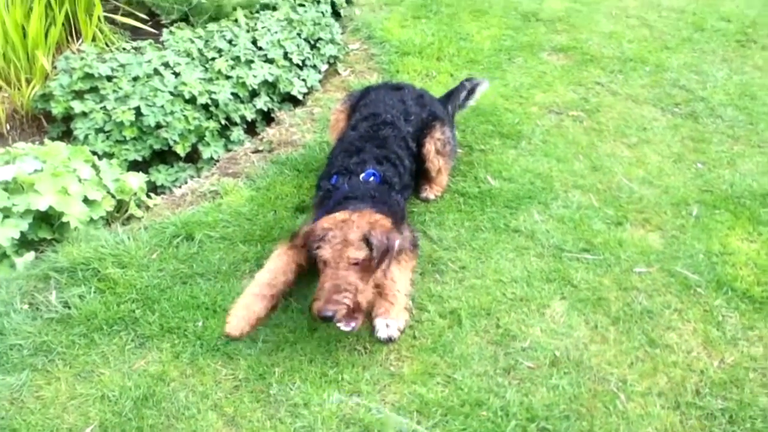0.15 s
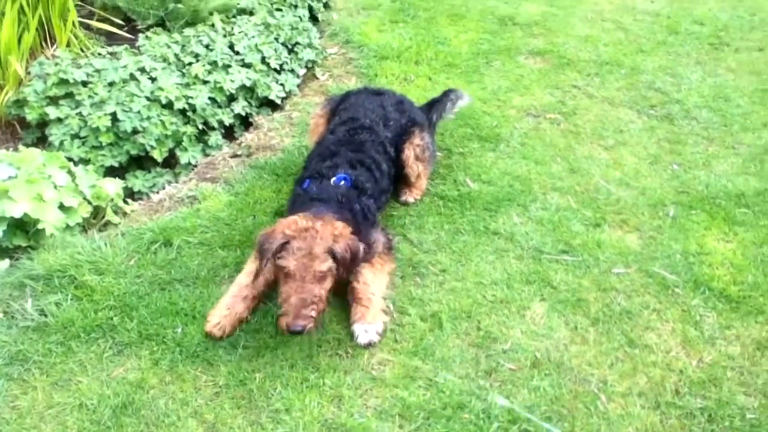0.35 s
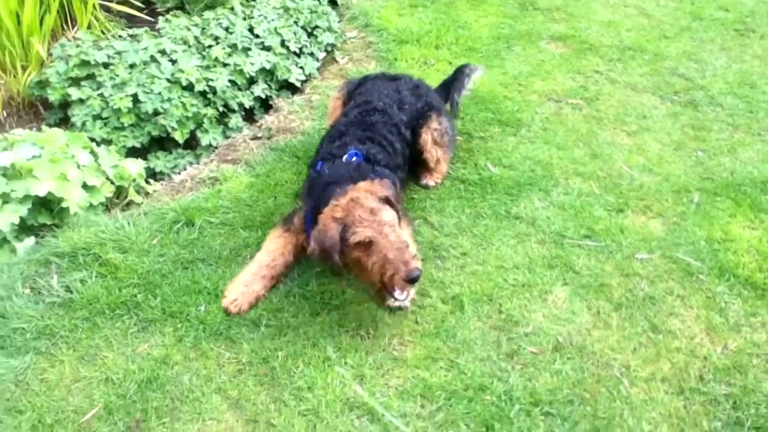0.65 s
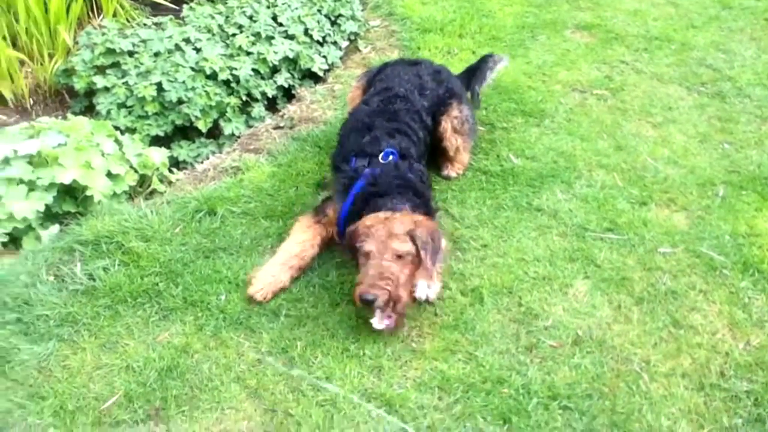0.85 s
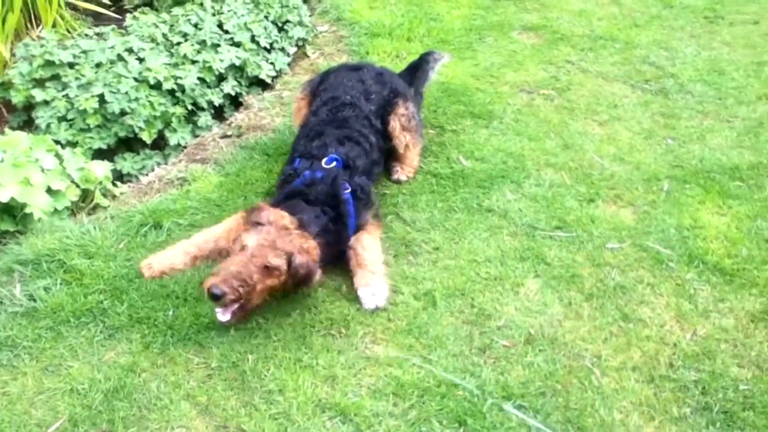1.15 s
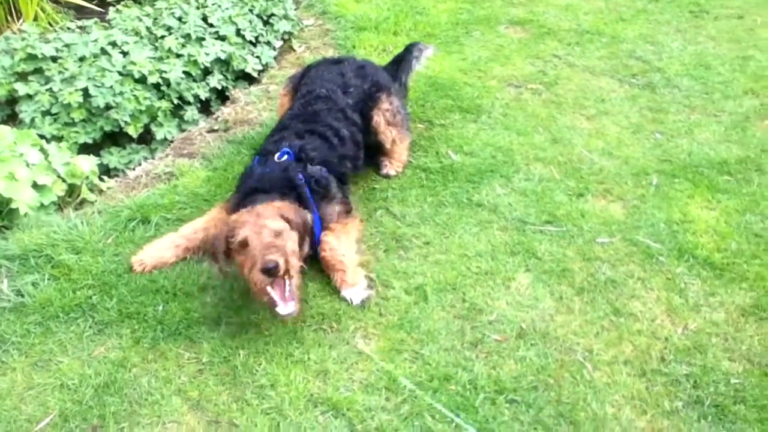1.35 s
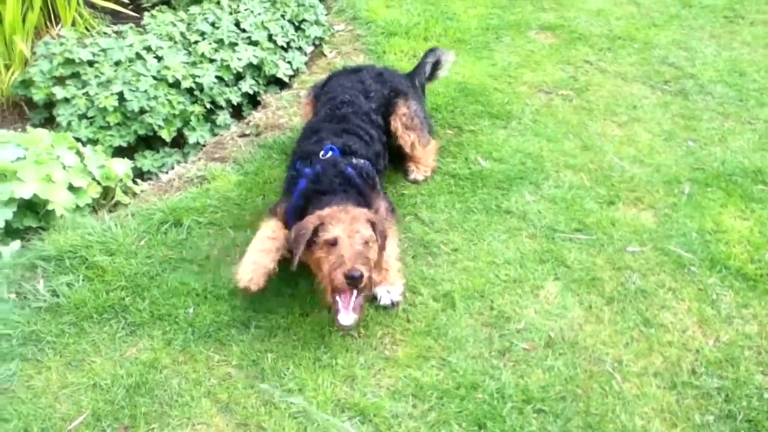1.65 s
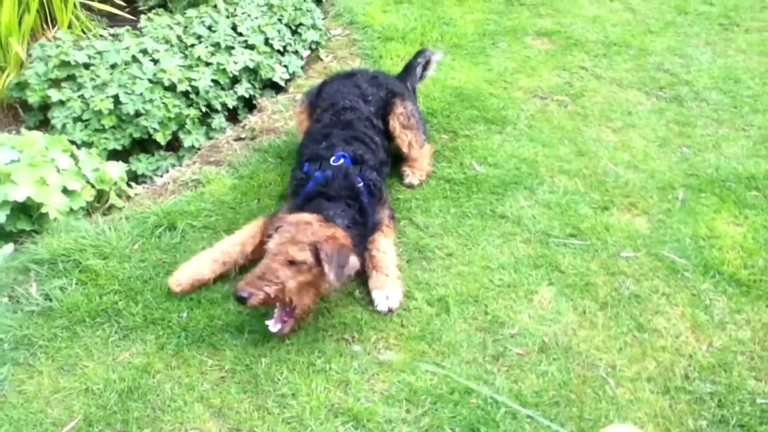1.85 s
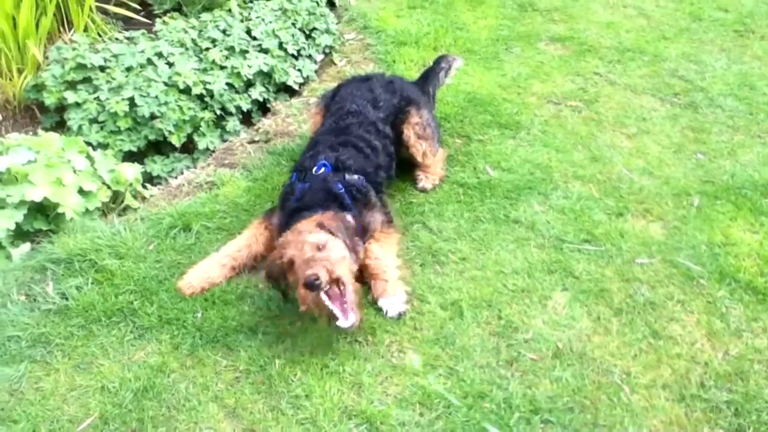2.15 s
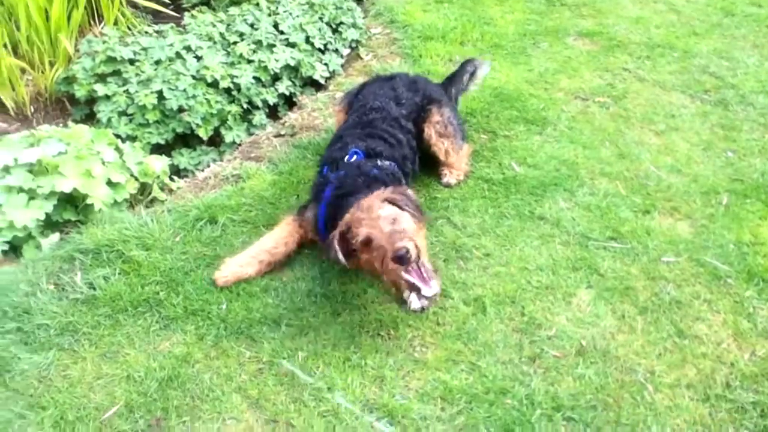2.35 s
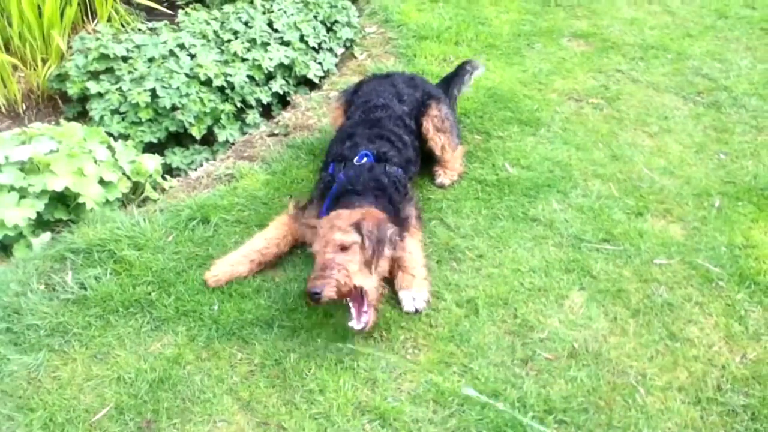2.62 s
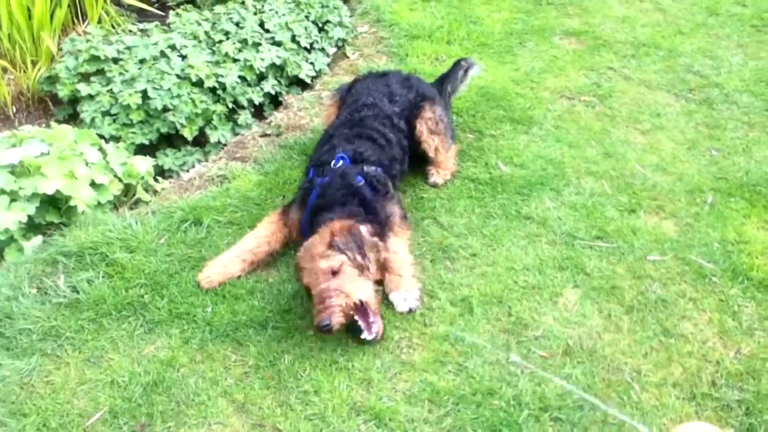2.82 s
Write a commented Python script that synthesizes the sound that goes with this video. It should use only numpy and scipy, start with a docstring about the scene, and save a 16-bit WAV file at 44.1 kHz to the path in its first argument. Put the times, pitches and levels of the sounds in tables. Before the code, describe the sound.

Close, dry, mono buzzing rattle of a battery water pistol in a garden: fast plastic slams and rebounds, short whirring gear whines, gritty grinding, then more crisp watery ticks as the squirting gets going.

```python
"""A battery water pistol fires about eleven strokes a second close to a phone in a garden.
Each stroke: the sprung piston slams, bounces, rattles and knocks again, ringing damped modes of the plastic shell.
The gears then whine as they draw it back, sine tones at the tooth rates, and grind as random contacts in the shell.
Sharp ticks of spray, short rings and fizz, come with a close echo over a garden rumble of filtered noise."""
import sys
import numpy as np
from scipy import signal
from scipy.fft import rfft, irfft
from scipy.io import wavfile
from scipy.ndimage import uniform_filter1d

SR = 44100
rng = np.random.default_rng(int(sys.argv[2]) if len(sys.argv) > 2 else 0)


def inscribe(sig):
    """Save sig as 16-bit PCM at rate SR to the path in sys.argv[1].

    A 1-D sig is mono; a 2-D sig holds one channel per row.
    Samples are clipped to [-1, 1] before scaling.
    """
    pcm = np.round(np.clip(np.atleast_2d(sig).T, -1, 1) * 32767)
    wavfile.write(sys.argv[1], SR, pcm.astype(np.int16))


def ratio_of_db(decibels):
    """Turn decibels (scalar or array-like) into linear amplitude factors; 0 dB maps to 1."""
    return 10 ** (np.asarray(decibels, float) / 20)


N = 131418

# piston slams: start_s, level_db (relative), thump_db (relative)
PISTON_SLAMS = [(0.0394, -6, -40), (0.124, -8.5, -38), (0.2095, -7, -35.5), (0.295, -8.5, -37),
                (0.3829, -9.5, -53), (0.471, -11, -37.5), (0.5614, -6.5, -50), (0.651, -10, -34.5),
                (0.7422, -6, -41), (0.8315, -7, -32.5), (0.924, -3.5, -36), (1.0125, -11, -32.5),
                (1.1026, -8.5, -70), (1.1938, -10, -29.5), (1.2843, -7.5, -44), (1.3756, -11.5, -33.5),
                (1.4671, -7, -36), (1.557, -10.5, -31), (1.6515, -6.5, -41), (1.741, -9.5, -29.5),
                (1.8351, -7.5, -44.5), (1.9262, -13.5, -35), (2.017, -8, -45), (2.1079, -8.5, -31.5),
                (2.199, -5, -38.5), (2.2885, -9, -31), (2.381, -5, -45), (2.471, -7, -28),
                (2.5633, -8.5, -49), (2.655, -7, -30), (2.7463, -7.5, -45), (2.8382, -10.5, -31),
                (2.928, -4.5, -43)]
# second knock of each stroke: start_s, level_db (relative)
PISTON_REBOUNDS = [(0.0545, -13), (0.138, -18), (0.2248, -18), (0.3089, -19), (0.3981, -17), (0.4865, -18),
                   (0.5743, -7.5), (0.665, -12.5), (0.7545, -13), (0.8453, -16), (0.935, -17),
                   (1.0266, -8.5), (1.117, -9), (1.2079, -10), (1.2981, -6), (1.3893, -22), (1.4809, -12),
                   (1.5718, -14), (1.6631, -11.5), (1.756, -11.5), (1.848, -5.5), (1.9393, -15),
                   (2.0308, -6), (2.1216, -8), (2.2129, -10.5), (2.3058, -9.5), (2.3943, -13),
                   (2.4852, -11), (2.5766, -4), (2.6669, -9.5), (2.7598, -14), (2.8501, -29),
                   (2.9418, -11.5)]
# stray knocks between strokes: start_s, level_db (relative)
STRAY_KNOCKS = [(0.7309, -9), (0.8746, -15), (0.9742, -14.5)]
# plastic shell modes: pitch_hz, t60_s, slam_db, rebound_db, grind_db (all relative)
SHELL_MODES = [(605, 0.047, -21, -72.5, -31), (820, 0.055, -16.5, -23, -30.5),
               (999, 0.042, -28, -15.5, -36), (1280, 0.079, -22, -20, -24.5),
               (1917, 0.025, -5.5, -7.5, -5.5), (2129, 0.049, -12.5, -19, -11.5), (2570, 0.01, 2.5, 6.5, 4),
               (2906, 0.0069, -9, 1, 3), (3583, 0.0078, 4, 8.5, 2.5), (3908, 0.0068, -13, 10, 1),
               (4696, 0.02, -10.5, -10, -8), (5230, 0.0098, -5.5, -5.5, -34), (6910, 0.011, -8, -11.5, -18),
               (7810, 0.0018, 2, -14, -78)]
# gear whine under load: centre_s, level_db (relative), pitch_hz (tooth rate before racing and sag)
GEAR_WHINES = [(0.096, -23, 2824), (0.178, -23.5, 2704), (0.259, -24, 2693), (0.348, -23.5, 2600),
               (0.437, -22.5, 2575), (0.526, -20, 2572), (0.618, -20, 2529), (0.707, -20, 2505),
               (0.799, -19.5, 2520), (0.888, -19, 2542), (0.98, -20, 2530), (1.068, -18, 2538),
               (1.159, -18.5, 2541), (1.247, -19.5, 2527), (1.339, -18.5, 2507), (1.429, -19.5, 2529),
               (1.52, -19, 2494), (1.612, -20, 2509), (1.704, -20.5, 2474), (1.795, -21, 2493),
               (1.89, -18.5, 2516), (1.981, -18, 2480), (2.074, -18, 2505), (2.163, -18.5, 2492),
               (2.254, -19, 2519), (2.345, -17.5, 2520), (2.434, -16, 2530), (2.526, -17, 2487),
               (2.619, -17, 2512), (2.707, -19.5, 2488), (2.8, -18.5, 2518), (2.892, -18.5, 2464)]
# sharp spray ticks: start_s, level_db (relative)
SPRAY_TICKS = [(0.0913, -22), (0.2836, -17.5), (0.361, -18), (0.377, -18), (0.5103, -16.5), (0.5604, -14.5),
               (0.566, -36), (0.6157, -19.5), (0.6434, -16), (0.661, -21), (0.677, -23), (0.7315, -18.5),
               (0.774, -17), (0.8095, -18), (0.8178, -13.5), (0.8379, -19), (0.8574, -20), (0.8748, -22),
               (0.879, -20), (0.8874, -30), (0.9141, -27), (0.927, -15.5), (0.974, -10.5), (1.002, -19),
               (1.0202, -19), (1.058, -15), (1.112, -19), (1.25, -23), (1.261, -19.5), (1.2748, -21),
               (1.438, -14), (1.499, -21), (1.623, -24), (1.664, -24), (1.701, -19), (1.7152, -16),
               (1.739, -18), (1.7848, -15.5), (1.8512, -18), (1.8685, -32), (1.8907, -13.5), (1.8978, -24),
               (1.906, -25), (1.9906, -17), (1.9915, -25), (1.9973, -20), (2.0125, -15), (2.063, -29),
               (2.0649, -27), (2.0825, -27), (2.085, -23), (2.0991, -16), (2.1213, -28), (2.1698, -28),
               (2.1767, -25), (2.1827, -12.5), (2.2513, -19.5), (2.2552, -21), (2.2672, -27), (2.3083, -30),
               (2.3538, -20.5), (2.385, -20), (2.3901, -29), (2.4189, -17), (2.4368, -13.5),
               (2.4863, -23.5), (2.5764, -20.5), (2.6437, -16), (2.6672, -25), (2.7487, -25), (2.8992, -19),
               (2.9393, -14), (2.9625, -44), (2.97, -16.5), (2.9728, -28)]
# spectrum of garden rumble and faint hiss: pitch_hz, level_db (per Hz, relative)
AIR_SPECTRUM = [(30, -5.5), (55, 5.5), (110, 5), (220, 4), (500, -50), (7000, -13), (16000, -48)]

# piston blows
SLAM_DB, REBOUND_DB, BLOW_SCATTER_DB = -4, -7, 1.5
BOUNCE_S, BOUNCE_DB = .0062, -14.5  # delay and level against the slam
CONTACT_S = .0005
RATTLE_DB, RATTLE_DECAY_S, RATTLE_PER_S = -29, 0.012, 900
# low thump
THUMP_HZ, THUMP_T60_S, THUMP_DB, THUMP_RISE_S = 312.8, 0.14, 3, 0.0024
REBOUND_THUMP_DB = -5.5  # against the slam before it
# gear whine
WHINE_HALF_S, WHINE_EDGE_S, WHINE_DB, IDLE_WHINE_DB = .012, .012, 2, -14
RACE, RACE_DECAY_S, RACE_DB = 0.33, 0.01, -13  # the motor races after a rebound
SAG_PER_S, LOW_SAG_PER_S = 0.201, 2.2  # fractional fall in pitch under load
TOOTH_JITTER, WOBBLE, FLUTTER_DB = .008, .2, 1.0
SECOND_GEAR, SECOND_DB, SECOND_LATE_S = .655, -19, 0.0076  # slower gear pair: tooth rate ratio
SECOND_IDLE, HALF_DB, LOW_GEAR_DB = 0.28, -32, -31.5
# grinding
GRIND_DB, GRIND_PER_S, GRIND_SPREAD_DB = -30.5, 2500, 0.5
GRIND_SWING_DB, GRIND_DIP_S = 1, 0.02  # quietest this long after each slam
# motor hum
HUM_HZ, HUM_DB = 316.5, -46.5
# spray
TICK_HZ, TICK_T60_S, TICK_DB, TICK_SNAP_DB, TICK_COLOUR_DB = 5990, 0.0015, -1.5, -14.5, 3
SMALL_TICK_DB, SMALL_TICK_PER_S, SMALL_SPREAD_DB = -16.5, 426, 5
SPRAY_ON_S, DRY_DB, WET_DB = .5, -28, -21  # fewer audible small ticks before the water flows
TICK_TAIL_DB, TICK_TAIL_S, CLUSTER_S = -15.5, 0.0021, 0.026
# surroundings
AIR_DB = -52
ECHO_S, GUN_ECHO_DB, TICK_ECHO_DB = .0045, -25, -4.5
SHELL_CUT_HZ, TOP_HZ = 285, 15500


def level(x, db):
    """Scale to an rms level."""
    return x * ratio_of_db(db) / np.sqrt(np.mean(x ** 2))


def spikes(s, size):
    """Impulses at the given times."""
    out = np.zeros(N, dtype=np.asarray(size).dtype)
    np.add.at(out, np.clip((np.asarray(s) * SR).astype(int), 0, N - 1), size)
    return out


def ring(x, hz, t60):
    """One damped mode, struck by x."""
    pole = np.exp(2j * np.pi * hz / SR - np.log(1000) / (t60 * SR))
    return signal.lfilter([1], [1, -pole], x).imag


def smear(x, decay_s):
    """Give each impulse an exponential tail."""
    return signal.lfilter([1], [1, -np.exp(-1 / (decay_s * SR))], x)


def grains(per_s, spread_db):
    """Random contacts of either sign, a few much stronger."""
    chance, side, strength = rng.random((3, N))
    return (chance < per_s / SR) * np.sign(side - .5) * ratio_of_db(-spread_db * np.log(strength + .02))


def walk(rate):
    """Smooth random wander, spread 1."""
    k = int(SR / rate)
    w = uniform_filter1d(uniform_filter1d(rng.standard_normal(N), k), k)
    return w / w.std()


def since(s):
    """Seconds since the latest of the given times; 1 before the first."""
    t = np.arange(N) / SR
    k = np.searchsorted(s, t) - 1
    return np.where(k < 0, 1, t - s[k])


def filtered(x, order, hz, kind):
    """Butterworth low or high cut."""
    return signal.sosfilt(signal.butter(order, hz, kind, fs=SR, output="sos"), x)


def piston_blows():
    """Slams, bounces, knocks and rattle strike the same plastic modes through a brief contact."""
    slam, back = np.array(PISTON_SLAMS), np.concatenate([PISTON_REBOUNDS, STRAY_KNOCKS])
    # for each blow and mode: a level scatter and a phase
    slam_gain, slam_phase = rng.standard_normal((2, len(slam), len(SHELL_MODES)))
    back_gain, back_phase = rng.standard_normal((2, len(back), len(SHELL_MODES)))
    fade = np.exp(-since(slam[:, 0]) / RATTLE_DECAY_S)
    rattle = grains(RATTLE_PER_S, 1.83) * fade * ratio_of_db(RATTLE_DB)
    contact_pole = np.exp(-1 / (CONTACT_S * SR))
    out = 0
    for k, (hz, t60, slam_db, back_db, _) in enumerate(SHELL_MODES):
        hit_db = slam[:, 1] + SLAM_DB + slam_db + BLOW_SCATTER_DB * slam_gain[:, k]
        knock_db = back[:, 1] + REBOUND_DB + back_db + BLOW_SCATTER_DB * back_gain[:, k]
        # the bounce borrows its scatter from the neighbouring mode
        bounce_db = slam[:, 1] + SLAM_DB + BOUNCE_DB + back_db + 2 * slam_gain[:, k - 1]
        blows = spikes(slam[:, 0], ratio_of_db(hit_db) * np.exp(2j * slam_phase[:, k]))
        blows += spikes(back[:, 0], ratio_of_db(knock_db) * np.exp(2j * back_phase[:, k]))
        blows += spikes(slam[:, 0] + BOUNCE_S, ratio_of_db(bounce_db) * np.exp(2j * slam_phase[:, k - 1]))
        # the mode builds up over the contact time
        turning_pole = contact_pole * np.exp(2j * np.pi * hz / SR)
        push = signal.lfilter([1 - contact_pole], [1, -turning_pole], blows)
        out = out + ring(push + rattle * ratio_of_db(back_db), hz, t60)
    return filtered(out, 2, 7500., "low")


def low_thump():
    """Each slam and second knock gives one low mode a rounded push."""
    slam, back = np.array(PISTON_SLAMS), np.array(PISTON_REBOUNDS)
    thump_db = slam[:, 2] + THUMP_DB
    thuds = spikes(slam[:, 0], ratio_of_db(thump_db))
    thuds += spikes(back[:, 0], ratio_of_db(thump_db + REBOUND_THUMP_DB))
    push = np.hanning(int(THUMP_RISE_S * SR))
    return ring(np.convolve(thuds, 2 * push / push.sum())[:N], THUMP_HZ, THUMP_T60_S)


def under_load(offset_s, half_s):
    """Soft-edged gate, open within half_s of the middle of a whine."""
    return 1 / (1 + np.exp(np.clip(4 * (np.abs(offset_s) - half_s) / WHINE_EDGE_S, -40, 40)))


def gear_whine():
    """Tooth tones of three gear pairs, the first two loudest while the spring is drawn back."""
    w, t = np.array(GEAR_WHINES), np.arange(N) / SR
    nearest = np.searchsorted((w[1:, 0] + w[:-1, 0]) / 2, t)
    offset = t - w[nearest, 0]
    race = np.exp(-since(np.array(PISTON_REBOUNDS)[:, 0]) / RACE_DECAY_S)
    base_hz = np.interp(t, w[:, 0], w[:, 2])
    sag = 1 - SAG_PER_S * np.clip(offset, -.03, .03)
    tooth_hz = base_hz * (1 + RACE * race + TOOTH_JITTER * walk(409.3)) * sag
    phase = 2 * np.pi * np.cumsum(tooth_hz) / SR

    load = under_load(offset, WHINE_HALF_S)
    wobble = 1 + WOBBLE * np.cos(phase / 8)  # an eccentric eight-tooth pinion
    idle = (ratio_of_db(IDLE_WHINE_DB) + ratio_of_db(RACE_DB) * np.sqrt(race)) * walk(630.0) * (1 - load)
    first = (load * wobble + idle) * ratio_of_db(FLUTTER_DB * walk(250.0)) * np.sin(phase)

    second_load = under_load(offset - SECOND_LATE_S, 0.018) + SECOND_IDLE
    second = second_load * ratio_of_db(SECOND_DB + 2.8 * walk(140)) * np.sin(SECOND_GEAR * phase)
    # half-rate tone of the slower gear
    half_load = under_load(offset, 0.038) + SECOND_IDLE
    half = half_load * ratio_of_db(HALF_DB + 2.1 * walk(36)) * np.sin(SECOND_GEAR * phase / 2)

    # a quarter of the tooth rate, sagging all stroke long
    low_phase = np.pi / 2 * np.cumsum(base_hz * (1 - LOW_SAG_PER_S * offset)) / SR
    low = ratio_of_db(LOW_GEAR_DB + 2 * walk(41)) * np.sin(low_phase)
    return ratio_of_db(w[nearest, 1] + WHINE_DB) * (first + second + half + low)


def gear_grinding():
    """Dense random gear contacts ring the shell modes and swell once a stroke."""
    start = np.array(PISTON_SLAMS)[:, 0]
    turn = 2 * np.pi * (since(start) - GRIND_DIP_S) / np.median(np.diff(start))
    contacts = grains(GRIND_PER_S, GRIND_SPREAD_DB) * ratio_of_db(-GRIND_SWING_DB * np.cos(turn))
    out = sum(ratio_of_db(grind_db) * ring(contacts, hz, t60) for hz, t60, _, _, grind_db in SHELL_MODES)
    return level(filtered(out, 2, 7500., "low"), GRIND_DB)


def motor_hum():
    """A low sine whose pitch and level wander."""
    hz = HUM_HZ * (1 + 0.014 * walk(27.3))
    return ratio_of_db(HUM_DB + 2 * walk(20)) * np.sin(2 * np.pi * np.cumsum(hz) / SR)


def spray_ticks():
    """A bright snap, a very short ring and a fizz; weaker ones cluster round the strong ones."""
    start, tick_db = np.transpose(SPRAY_TICKS)
    colour_db = TICK_COLOUR_DB * np.clip(rng.standard_normal((len(start), 4)), -1.5, 1.5)
    strong = spikes(start, ratio_of_db(tick_db))
    k = int(CLUSTER_S * SR)
    cluster = k * uniform_filter1d(uniform_filter1d(strong, k), k)
    busy = cluster + ratio_of_db(np.where(np.arange(N) < SPRAY_ON_S * SR, DRY_DB, WET_DB))
    small = grains(SMALL_TICK_PER_S, SMALL_SPREAD_DB) * busy * ratio_of_db(SMALL_TICK_DB)
    rings = ring(small, TICK_HZ, TICK_T60_S)
    for k, ratio in enumerate((.84, 1.02, 1.4)):
        hits = spikes(start, ratio_of_db(tick_db + TICK_DB + colour_db[:, k]))
        rings += ring(hits, TICK_HZ * ratio, TICK_T60_S)
    snap = ring(spikes(start, ratio_of_db(tick_db + colour_db[:, -1])) + small, 11200.0, 0.001)
    fizz = smear(strong + np.abs(small), TICK_TAIL_S) * rng.standard_normal(N) * ratio_of_db(TICK_TAIL_DB)
    return rings + ratio_of_db(TICK_SNAP_DB) * snap + ring(fizz, 6780.0, 0.00044)


def garden_air():
    """Steady coloured noise whose level drifts a little."""
    hz, (point_hz, point_db) = np.fft.rfftfreq(N, 1 / SR), np.transpose(AIR_SPECTRUM)
    shape = ratio_of_db(np.interp(np.log(hz + 1), np.log(point_hz), point_db))
    noise = irfft(rfft(rng.standard_normal(N)) * shape, N)
    return level(noise, AIR_DB) * ratio_of_db(walk(21))


def scene():
    """The pistol and the ticks, each heard directly and by one close echo, over the garden air."""
    gun = piston_blows() + low_thump() + gear_whine() + gear_grinding() + motor_hum()
    gun = filtered(gun, 6, SHELL_CUT_HZ, "high")
    tick = filtered(spray_ticks(), 2, 3500., "high")
    reflected = ratio_of_db(GUN_ECHO_DB) * gun + ratio_of_db(TICK_ECHO_DB) * tick
    echo = np.concatenate([np.zeros(int(ECHO_S * SR)), reflected])[:N]
    return (gun + tick + echo + garden_air())[None]


def band_limit(x):
    """A steep low-pass at the top of the band."""
    return signal.sosfilt(signal.butter(12, 16810, fs=SR, output="sos"), x)


def record(dry):
    """The phone rounds the loudest peaks and cuts the top."""
    soft = .9 * np.tanh(dry / .9)
    finished = signal.sosfilt(signal.ellip(8, .2, 50, TOP_HZ, fs=SR, output="sos"), soft)
    return band_limit(finished)


dry = scene()
out = record(dry)
inscribe(out)
```